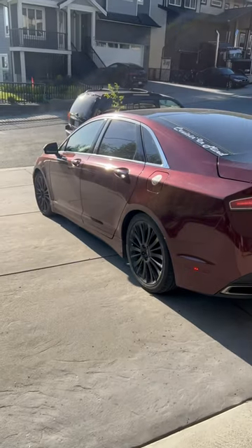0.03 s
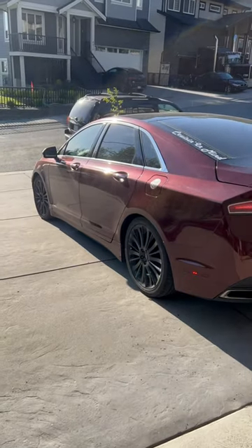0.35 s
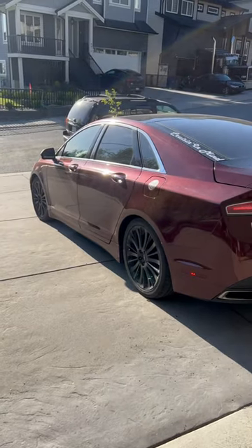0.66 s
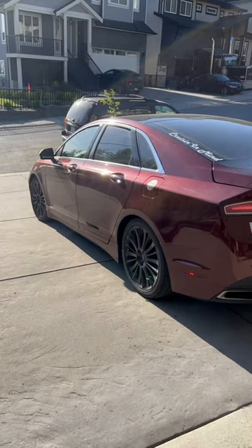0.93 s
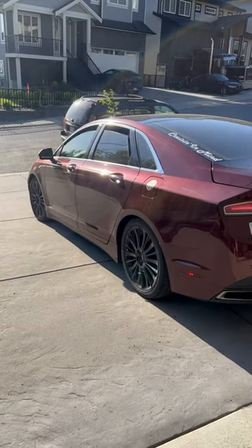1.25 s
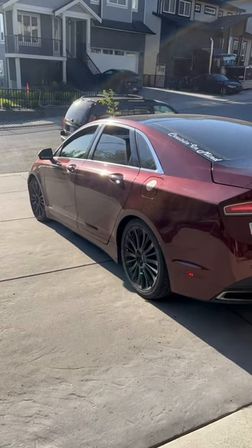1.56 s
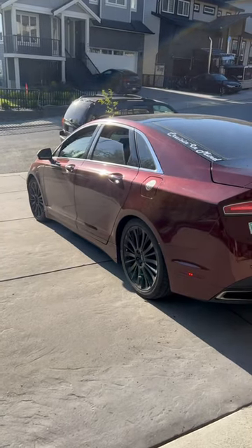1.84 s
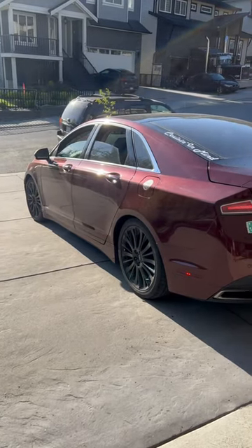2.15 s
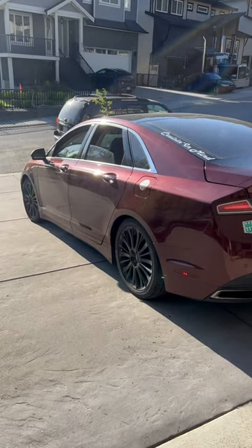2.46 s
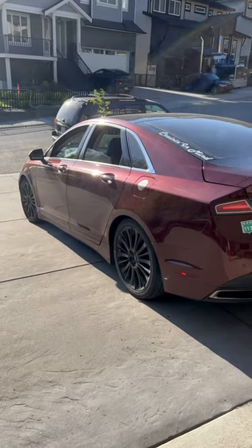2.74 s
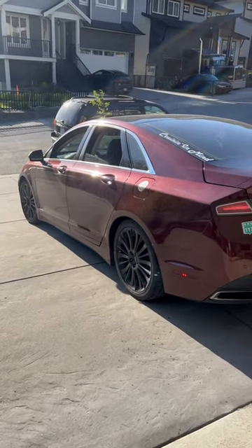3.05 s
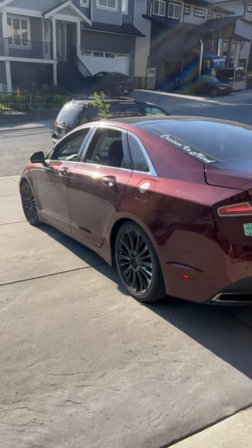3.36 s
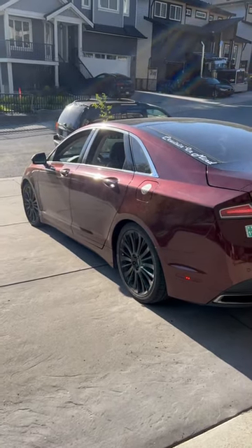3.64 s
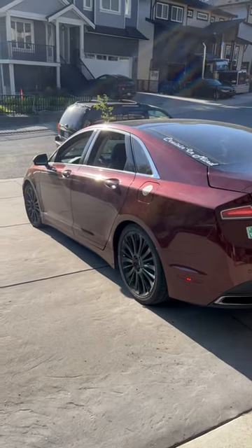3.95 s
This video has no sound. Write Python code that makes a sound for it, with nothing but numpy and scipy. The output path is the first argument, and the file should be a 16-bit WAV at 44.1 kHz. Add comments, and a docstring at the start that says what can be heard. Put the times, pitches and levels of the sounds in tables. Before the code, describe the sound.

Power car windows whirr down and thump to a stop, with button clicks over outdoor rumble.

```python
"""A driveway, a pair of microphones a few metres from a parked car; outdoor rumble and a low hum throughout.
At 0.6 s the power windows knock and crackle free of their seals, and the cabin booms. The glass slides
down over whirring motors and knocks again; at 1.3 s a button clicks close to the microphones.
A distant engine gathers speed until 3 s, then eases off. At 3.4 s the glass thumps against the end
stops, and the button clicks twice more as the motors fade."""
import sys
import numpy as np
from scipy import signal
from scipy.fft import rfft, irfft
from scipy.io import wavfile

SR = 44100
rng = np.random.default_rng(int(sys.argv[2]) if len(sys.argv) > 2 else 0)


def wrap_up_sound(samples):
    """Save the sound to the file named by the first command line argument, as 16-bit audio."""
    columns = np.atleast_2d(samples).T
    # keep every value between -1 and 1, then stretch to whole-number steps
    tamed = np.clip(columns, -1, 1)
    steps = np.round(tamed * 32767).astype(np.int16)
    wavfile.write(sys.argv[1], SR, steps)


N = 176400
TIME = np.arange(N) / SR

# Glass sliding in its channels: t/s, rub level/dB, hiss level/dB
SLIDE_LEVELS = [(0.58, -105, -115), (0.612, -60, -90), (0.7, -52, -73), (0.78, -56, -79),
                (0.815, -54, -60.5), (0.9, -58.5, -63.5), (1.05, -61.5, -66.5), (1.27, -65.5, -67.5),
                (1.55, -63.5, -67.5), (2.3, -61, -70.5), (2.9, -60.5, -72.5), (3.37, -62, -77.5),
                (3.6, -57.5, -87), (3.72, -69.5, -100), (3.85, -100, -115)]
# Spectra of the low rub and the high hiss: f/Hz, density/dB
RUB_SPECTRUM = [(100, -3.5), (280, 7), (420, 8), (600, 0), (850, 2), (1200, -3.5), (1550, -5.5),
                (2000, -10.5), (2600, -5.5), (2950, -11.5), (3400, -15), (3900, -16), (5000, -21.5),
                (16000, -41)]
HISS_SPECTRUM = [(1000, -31), (2800, 2), (3400, -3.5), (3800, -0.5), (4650, -2.5), (5050, -6.5),
                 (5600, -3.5), (6900, -3), (7400, -14), (8100, -6.5), (8900, -16.5), (11500, -21),
                 (14000, -30.5), (17000, -39.5)]
def windows(rough_db=0.5, rough_hz=120, grit_db=-19):
    """A few metres off, motors draw the glass down; it rubs and hisses unevenly in its channels."""
    rub_db, hiss_db = by_time(SLIDE_LEVELS)
    grip = amp(rough_db * wander(rough_hz) + 0.5 * wander(9))
    rub = motors() + grip * noise(RUB_SPECTRUM) + amp(grit_db) * grit()
    hiss = grip * (noise(HISS_SPECTRUM) + whirr())
    return amp(rub_db) * rub + amp(hiss_db) * hiss


# Window motor: t/s, rotation rate/Hz
MOTOR_SPEED = [(0.6, 74.4), (0.85, 100.4), (1.05, 101.4), (1.45, 94), (2.1, 108), (2.7, 102), (3.38, 96),
               (3.65, 87)]
def motors(second_ratio=0.86):
    """Two window motors run together, the second a little slower."""
    speed, = by_time(MOTOR_SPEED)
    return (motor(speed) + motor(speed * second_ratio)) / 2


def motor(speed, waver=0.00393, hum_db=-1, buzz_db=-5):
    """The armature hums at three times its rotation rate; the door colours the buzz of higher orders."""
    angle = 2 * np.pi * np.cumsum(speed * (1 + waver * wander(8.5))) / SR
    hum = np.sqrt(2) * np.sin(3 * angle)
    cycle = np.linspace(0, 2 * np.pi, 1024)
    orders = [(k, amp(by_hz(RUB_SPECTRUM, k * speed.mean()))) for k in range(4, 48)]
    buzz = np.zeros((2, N))
    for mic in range(2):
        one_turn = sum(gain * np.sin(k * cycle + 2 * np.pi * rng.random()) for k, gain in orders)
        buzz[mic] = np.interp(angle % (2 * np.pi), cycle, one_turn)
    return amp(hum_db + 2.0 * wander(3.6)) * hum + amp(buzz_db) * unit(buzz)


# Resonances of the running mechanism: f/Hz, width/Hz, gain near the top/dB, gain near the bottom/dB
WHIRR_BANDS = [(2650, 370, -4, -11), (3318, 160, -10, 0.5), (3550, 160, -6.5, -11), (4630, 180, -20, -7.5),
               (7380, 270, -13, -7), (7880, 220, -18, -12.5)]
def whirr(travel_s=(0.85, 3.35), flutter_db=1.8):
    """Friction excites narrow resonances, whose strengths shift as the glass sinks into the door."""
    hz = np.fft.rfftfreq(N, 1 / SR)
    friction = rfft(noise(HISS_SPECTRUM))
    out = np.zeros((2, N))
    for centre, width, top_db, bottom_db in WHIRR_BANDS:
        db = np.interp(TIME, travel_s, [top_db, bottom_db]) + flutter_db * wander(8.7)
        band = irfft(friction / (1 + ((hz - centre) / width) ** 2) ** 2, N)
        out += amp(db) * unit(band)
    return out


# Spectrum of rattling glass, in grit ticks and in knocks: f/Hz, density/dB
RATTLE_SPECTRUM = [(100, -23), (800, 2.5), (1100, -5), (1500, -2.5), (2150, -3), (2380, -2.5), (2800, 1),
                   (3300, -5), (4150, -9.5), (4450, -14), (5200, -15), (7000, -25.5), (9500, -41),
                   (16000, -55)]
def grit(per_s=39, spread_db=9, t60=0.052, size=2500):
    """Grit ticks at random between glass and channel."""
    strength = amp(spread_db * np.minimum(rng.exponential(1, N), 3))
    hits = strength * (rng.random(N) < per_s / SR)
    tick = noise(RATTLE_SPECTRUM, size) * decay(np.arange(size) / SR, t60)
    return unit(signal.oaconvolve(hits[None], tick, axes=1)[:, :N])


KNOCK_RISE_S = 0.0014
# Knocks in the doors: t/s, body level/dB, rattle level/dB, thump level/dB, panel ring level/dB
DOOR_KNOCKS = [(0.601, -59, -67, -68, -68), (0.618, -51, -83, -66, -61), (0.666, -40.5, -82, -43, -60),
               (0.679, -49.5, -55.5, -39, -70), (0.697, -45, -71, -32.5, -72),
               (0.72, -45.5, -74, -32.5, -58.5), (0.75, -53, -68, -48, -64), (0.769, -48, -68, -39, -64),
               (0.818, -60.5, -63, -65, -74), (1.145, -51.5, -70, -58, -71), (1.174, -44.5, -71, -39, -64),
               (1.205, -46, -75, -51, -74), (1.244, -53.5, -82, -62, -70), (3.3925, -35.5, -39.5, -69, -50),
               (3.411, -34.5, -43.5, -49, -41.5), (3.419, -36, -50, -32, -48.5),
               (3.447, -56, -48, -53, -52.5), (3.481, -36, -55.5, -30.5, -59),
               (3.522, -53, -63, -29.5, -69), (3.565, -65, -66, -53, -64), (3.609, -62, -75, -40.5, -77),
               (3.651, -63, -68, -49, -67)]
# Spectrum of a knock's dull body: f/Hz, density/dB
BODY_SPECTRUM = [(20, -25), (45, -25), (100, -8.5), (240, -3.5), (400, -8.5), (560, -14.5), (800, -12),
                 (1150, -30.5), (2000, -27), (5000, -45), (16000, -83)]
# Ring time of a knock: f/Hz, t60/s
KNOCK_DECAY = [(60, 0.14), (250, 0.19), (700, 0.2), (1800, 0.32), (4000, 0.18), (9000, 0.17)]
# Modes of the door panel, and of the pane with its lifter: f/Hz, gain/dB, t60/s
PANEL_MODES = [(225, -1.5, 0.15), (370.6, 4.5, 0.41), (403, 1.5, 0.45), (491.5, 1, 0.23), (583, -3, 0.25),
               (643, -2, 0.17), (678, 0.5, 0.34), (798, -4, 0.53), (890, -10, 0.27)]
PANE_MODES = [(1207, -14.5, 0.38), (1350, -13, 0.29), (1491, -7, 0.29), (1659, -10, 0.25),
              (1770, -15.5, 0.46), (1853, -14, 0.12), (2040, -9.5, 0.2), (2240, -10, .26), (2520, -8, 0.5),
              (2470, -27, 0.21), (2795, -11, 0.29), (3170, -19, .22), (3472, -25, 0.27), (3736, -21, .28),
              (4210, -19, .2)]
def knocks(thump_hz=99, thump_t60=0.12, thump_rise_s=0.0021, size=24000):
    """The glass breaks free and later lands: dull pushes, low thumps, rattling pane, ringing panel."""
    out, t = np.zeros((2, N)), np.arange(size) / SR
    for s, body_db, rattle_db, thump_db, _ in DOOR_KNOCKS:
        body = amp(body_db) * noise(BODY_SPECTRUM, size)
        rattle = amp(rattle_db) * noise(RATTLE_SPECTRUM, size)
        burst = die_away(body + rattle, KNOCK_DECAY) * np.minimum(t / KNOCK_RISE_S, 1)
        thump = amp(thump_db) * ring(t, thump_hz, thump_t60) * (1 - np.exp(-t / thump_rise_s))
        add(out, s, burst + thump)
    times, _, pane_db, _, panel_db = np.transpose(DOOR_KNOCKS)
    return out + struck_modes(PANEL_MODES, times, panel_db) + struck_modes(PANE_MODES, times, pane_db)


def struck_modes(modes, times, levels_db, jitter_turns=0.04, jitter_hz=30):
    """Each blow adds energy to modes that then die away; loose parts unsettle the ringing."""
    out, blows = np.zeros((2, N)), np.zeros(N)
    for s, db in zip(times, levels_db):
        blows[round(s * SR)] += amp(db) ** 2
    rise = np.exp(-1 / (KNOCK_RISE_S * SR))
    blows = signal.lfilter([1 - rise], [1, -rise], blows + 1e-20)
    for hz, db, t60 in modes:
        energy = signal.lfilter([1], [1, -decay(1 / SR, t60) ** 2], blows)
        mic_phase = rng.random() + (1 - by_hz(MIC_LIKENESS, hz)) * rng.random((2, 1))
        turns = hz * TIME + mic_phase + jitter_turns * wander(jitter_hz)
        out += amp(db) * np.sqrt(energy) * np.sin(2 * np.pi * turns)
    return out


# Rubber seal catching and letting go: t/s, snap level/dB, chirp f/Hz, chirp level/dB
SEAL_SNAPS = [(0.619, -70, 900, -44), (0.668, -71, 690, -50), (0.678, -57, 3210, -59),
              (0.694, -54, 2800, -51), (0.7012, -65, 2550, -41.5), (0.726, -74, 1280, -44.5),
              (0.773, -71, 3500, -50), (1.578, -66, 2640, -50), (2.728, -74, 2650, -56)]
# Spectrum of a snap: f/Hz, density/dB
SNAP_SPECTRUM = [(500, -18), (2500, -2), (4000, 4), (5200, 3), (7000, 3), (9000, -7), (12000, -15),
                 (16000, -15)]
def seal_crackles(snap_t60=0.057, chirp_t60=0.031, chirp_rise_s=0.0013, size=6000):
    """The seal peels off the glass in a few crisp snaps, each with a short rubbery chirp."""
    out, t = np.zeros((2, N)), np.arange(size) / SR
    for s, snap_db, chirp_hz, chirp_db in SEAL_SNAPS:
        snap = amp(snap_db) * noise(SNAP_SPECTRUM, size) * decay(t, snap_t60)
        chirp = amp(chirp_db) * ring(t, chirp_hz, chirp_t60) * (1 - np.exp(-t / chirp_rise_s))
        add(out, s, snap + chirp)
    return out


def cabin_boom(start_s=0.66, db=-52):
    """The cabin gives one slow, deep ring as the seal lets go."""
    return amp(db) * ring(TIME - start_s, hz=35.2, t60=1.0)


def panel_song(peak_s=2.95, half_length_s=0.06, hz=489, db=-58):
    """One resonance of the door panel swells and fades under the sliding glass."""
    swell = np.exp(-((TIME - peak_s) / half_length_s) ** 2)
    return amp(db) * swell * np.sin(2 * np.pi * hz * TIME)


# Button clicks: t/s, level/dB
BUTTON_CLICKS = [(1.3031, -25), (3.7192, -34), (3.9162, -25)]
# Modes of the button: f/Hz, gain/dB, t60/s, delay/s
BUTTON_MODES = [(1470, -7, 0.0032, 0.00091), (2300, 1.5, 0.0044, 0.00086), (2880, -7.5, 0.0032, .0006),
                (3670, -15, 0.0043, .0004), (4620, -11, .004, 0.00023), (5880, -3, 0.0053, 0.00021),
                (7370, 2, 0.0026, 0.000343), (8020, 4.5, 0.0026, 0.00021), (9960, -5.5, 0.0022, 0.000313),
                (12200, -4.5, 0.0026, 0.000305), (15200, 2, .0009, 0.000292)]
# Reflections from the hand and the ground: delay/s, gain/dB
NEAR_ECHOES = [(.0043, -13.5), (0.0127, -23.5)]
# Spectrum of the tail from the yard: f/Hz, density/dB
YARD_SPECTRUM = [(300, -25), (1400, -5), (2300, -1), (3300, -4.5), (5000, -5), (6500, 3.5), (8000, -0.5),
                 (10500, -8.5), (14000, -10), (16000, -11)]
# Ring time of the yard: f/Hz, t60/s
YARD_DECAY = [(500, 0.3505), (2500, 0.5), (7000, 0.24), (14000, 0.19)]
def button(yard_db=-27, yard_rise_s=0.0032, size=16000):
    """A small plastic button snaps close to the microphones; near surfaces and the yard throw it back."""
    out, t = np.zeros((2, N)), np.arange(size) / SR
    snap = np.zeros(size)
    for hz, db, t60, delay in BUTTON_MODES:
        ramp = np.log(1000) * (t - delay) / t60
        snap += amp(db) * ramp * ring(t - delay, hz, t60)
    for s, db in BUTTON_CLICKS:
        tail = die_away(noise(YARD_SPECTRUM, size), YARD_DECAY) * np.minimum(t / yard_rise_s, 1)
        add(out, s, amp(db) * (snap + amp(yard_db) * tail))
        for delay, echo_db in NEAR_ECHOES:
            add(out, s + delay, amp(db + echo_db) * snap)
    return out


# Engine speed: t/s, firing rate/Hz
FIRING_RATE = [(0, 34), (0.9, 35.6), (1.4, 38.4), (1.75, 39.8), (2.09, 41.5), (2.35, 43.3), (2.6, 45),
               (2.8, 46.2), (2.98, 46.6), (3.12, 45.3), (3.29, 42.8), (3.68, 36.3), (4, 34.5)]
# Engine as heard from the driveway: t/s, level/dB
ENGINE_LEVEL = [(0, -84.5), (0.9, -59), (1.5, -61), (1.8, -54), (2.09, -48.5), (2.35, -54), (2.6, -52.5),
                (2.8, -49), (2.98, -45), (3.14, -51), (3.29, -53.5), (3.68, -52.5), (4, -60.5)]
# Engine orders: multiple of the firing rate, relative level/dB
ENGINE_HARMONICS = [(3, -16), (4, -0.5), (5, 0.5), (6, -11), (7, -29.5), (8, -24.5), (9, -14.5)]
def distant_engine(waver=0.0032, flutter_db=1, rough_db=2, rough_hz=25.8):
    """Far off, an engine gathers speed and eases off; only its low orders carry to the driveway."""
    firing_hz, = by_time(FIRING_RATE)
    level_db, = by_time(ENGINE_LEVEL)
    angle = 2 * np.pi * np.cumsum(firing_hz * (1 + waver * wander(7.6))) / SR
    drone = np.zeros(N)
    for order, db in ENGINE_HARMONICS:
        gain = amp(db + flutter_db * wander(6.2) + rough_db * wander(rough_hz))
        drone += gain * np.sin(order * angle + 2 * np.pi * rng.random())
    return amp(level_db) * unit(drone)


# Low rumble around the car: t/s, level/dB
RUMBLE_SWELLS = [(0, -57.5), (0.3, -57.5), (0.45, -46.5), (0.58, -59.5), (0.7, -40), (0.9, -51.5),
                 (1.02, -54.5), (1.15, -49), (1.42, -51.5), (1.6, -55), (2.3, -54), (3.1, -57.5),
                 (3.6, -54.5), (3.96, -54.5), (4, -50)]
# Spectra of the rumble and of the open air: f/Hz, density/dB
RUMBLE_SPECTRUM = [(15, -34.5), (36, -6), (48, -16), (66, 6), (90, 3.5), (120, 0), (170, -11.5),
                   (300, -20.5), (1000, -69), (16000, -100)]
AIR_SPECTRUM = [(15, -25), (28, -22.5), (48, -19), (66, -1), (85, -6), (115, -1.5), (170, -8), (280, -7.5),
                (400, -16.5), (600, -21.5), (870, -14), (1200, -26.5), (2000, -42), (3500, -49.5),
                (7000, -54), (11000, -60), (16000, -73)]
def outdoors(air_db=-55, swell_db=1.26, hum_hz=69.17, hum_db=-58, waver=0.022, flutter_db=-0.5):
    """Behind the car lie far traffic, rumble and a wavering low hum."""
    angle = 2 * np.pi * np.cumsum(hum_hz * (1 + waver * wander(8.9))) / SR
    hum = np.sin(angle) * amp(flutter_db * wander(7.3))
    air = amp(air_db + swell_db * wander(13)) * noise(AIR_SPECTRUM)
    rumble = amp(by_time(RUMBLE_SWELLS)[0]) * noise(RUMBLE_SPECTRUM)
    return air + rumble + amp(hum_db) * unit(hum)


# Likeness of the sound at the two microphones: f/Hz, correlation/0..1
MIC_LIKENESS = [(25, 1), (300, 1), (600, .05), (1400, .75), (3100, .45), (6800, 0.8), (11000, 1)]
def noise(spectrum, size=N):
    """Coloured noise, rms 1, partly alike at the two microphones."""
    hz = np.fft.rfftfreq(size, 1 / SR)
    left, unrelated = np.exp(2j * np.pi * rng.random((2, len(hz))))
    likeness = np.clip(by_hz(MIC_LIKENESS, hz), 0, 1)
    right = likeness * left + np.sqrt(1 - likeness ** 2) * unrelated
    return unit(irfft(np.array([left, right]) * amp(by_hz(spectrum, hz)), size))


def wander(hz):
    """Random drift, rms 1, mostly slower than the given rate."""
    f = np.fft.rfftfreq(N, 1 / SR)
    return unit(irfft(rfft(rng.standard_normal(N)) * (f > 0) / (1 + (f / hz) ** 2), N))


def decay(t, t60):
    """Envelope that falls 60 dB in t60 seconds."""
    return np.exp(-np.log(1000) * t / t60)


def ring(t, hz, t60):
    """One dying mode, silent before t = 0."""
    return (t >= 0) * decay(np.maximum(t, 0), t60) * np.sin(2 * np.pi * hz * t)


def die_away(x, ring_times):
    """Lets each band of a sound decay at its own speed."""
    size = x.shape[-1]
    hz, t = np.fft.rfftfreq(size, 1 / SR), np.arange(size) / SR
    spectrum = rfft(x)
    centres, t60s = np.transpose(ring_times)
    bands = [by_hz(np.c_[centres, weights], hz) for weights in np.eye(len(t60s))]
    return sum(irfft(spectrum * band, size) * decay(t, t60) for band, t60 in zip(bands, t60s))


def amp(db):
    """Decibels to gain."""
    return 10 ** (np.asarray(db) / 20)


def unit(x):
    """Scales to rms 1."""
    return x / np.sqrt(np.mean(x ** 2) + 1e-20)


def by_hz(points, hz):
    """Reads a table on a log-frequency axis."""
    f, value = np.transpose(points)
    return np.interp(np.log(hz + 1), np.log(f + 1), value)


def by_time(points):
    """Reads each column of a curve at every sample."""
    s, *columns = np.transpose(points)
    return [np.interp(TIME, s, column) for column in columns]


def add(mix, s, sound):
    """Mixes a sound in at s seconds."""
    part = mix[:, round(s * SR):][:, :sound.shape[-1]]
    part += sound[..., :part.shape[1]]


def across_mics(x, lead, tilt):
    """Splits a phase and a level difference between the left and right microphones."""
    size = 2 * N
    hz, sides = np.fft.rfftfreq(size, 1 / SR), np.array([[0.5], [-0.5]])
    gain = amp(sides * by_hz(tilt, hz))
    phase = sides * by_hz(lead, hz)
    return irfft(rfft(x, size) * gain * np.exp(1j * phase), size)[:, :N]


# Door panels at the microphones, phase: f/Hz, left lead/rad
DOOR_LEAD = [(300, 0), (400, -1.54), (560, -1.5), (750, -2), (1200, -3), (1700, -2), (2300, -1), (3000, 0)]
# Door panels at the microphones, balance: f/Hz, left minus right/dB
DOOR_TILT = [(200, -0.5), (500, -1), (1000, 1), (2000, 0.5)]
def scene():
    """The car a few metres away, the button close by, the street behind."""
    car = windows() + seal_crackles() + panel_song() + cabin_boom()
    car += across_mics(knocks(), DOOR_LEAD, DOOR_TILT)
    return car + button() + distant_engine() + outdoors()


# Microphone pair, phase: f/Hz, left lead/rad
MIC_LEAD = [(100, 0), (400, 0), (850, 0), (1300, 0.88), (2000, 0.9), (2900, -2.5), (4000, .5),
            (5200, -1.86), (6800, -1), (8000, -1), (10000, -1.37), (16000, -1.7)]
# Microphone pair, balance: f/Hz, left minus right/dB
MIC_TILT = [(60, 1.15), (200, 1.7), (380, 3.5), (700, -1.4), (2400, 0.2), (15000, 0)]
def record(dry, cutoff_hz=16800):
    """The pair on the driveway: phase and level differences between its sides, then the band limit."""
    lowpass = signal.firwin(511, cutoff_hz, window=("kaiser", 9), fs=SR)
    return signal.oaconvolve(across_mics(dry, MIC_LEAD, MIC_TILT), lowpass[None], "same")


dry = scene()
out = record(dry)
wrap_up_sound(out)
```